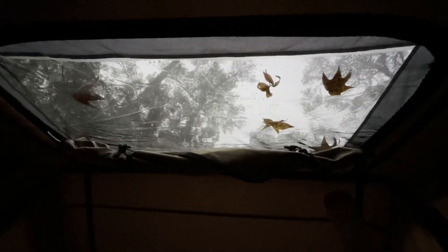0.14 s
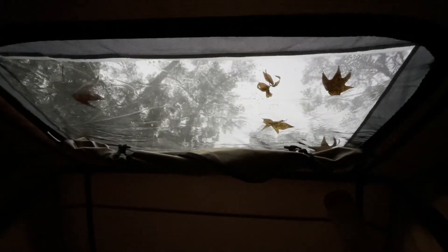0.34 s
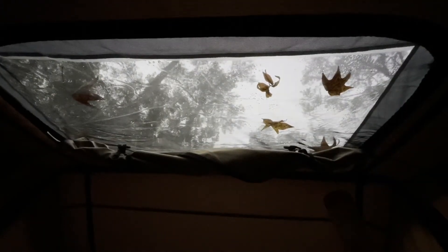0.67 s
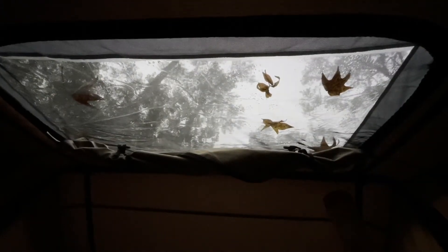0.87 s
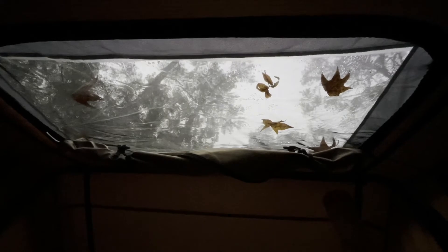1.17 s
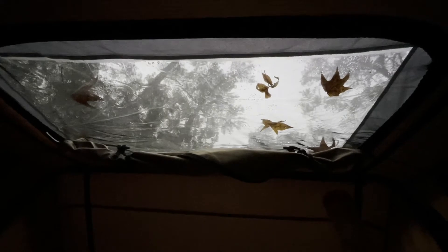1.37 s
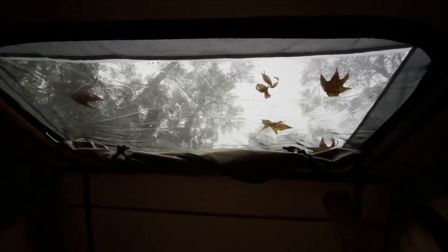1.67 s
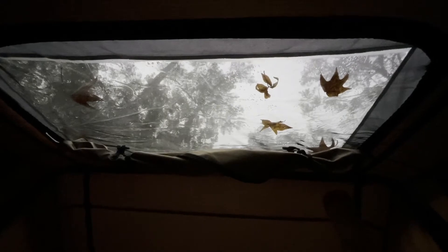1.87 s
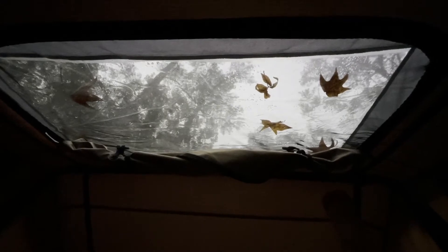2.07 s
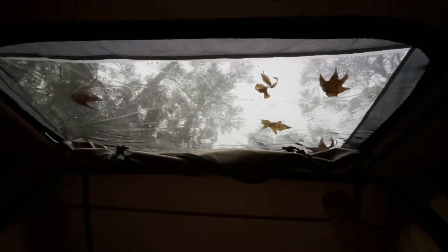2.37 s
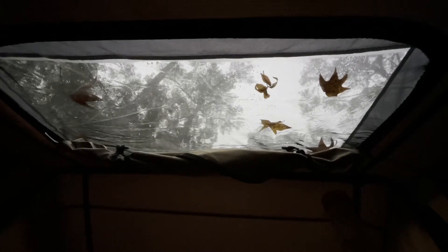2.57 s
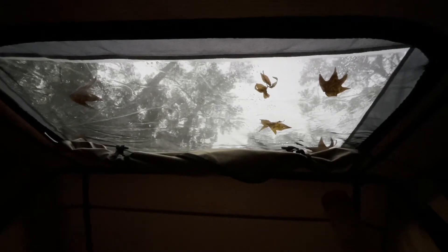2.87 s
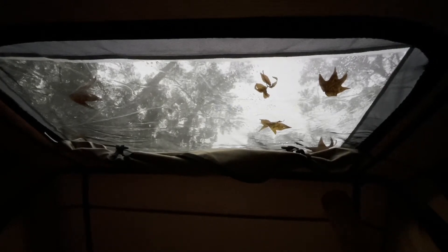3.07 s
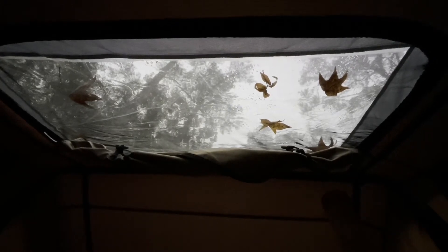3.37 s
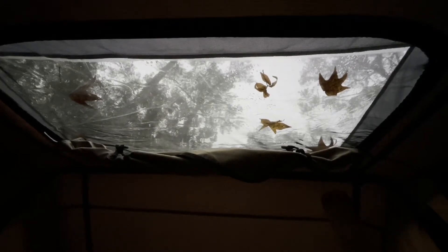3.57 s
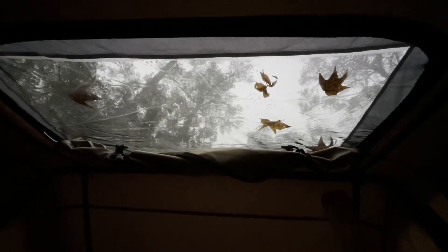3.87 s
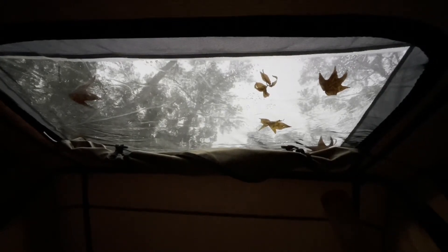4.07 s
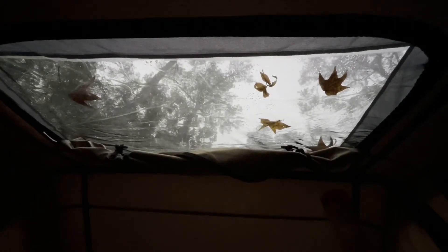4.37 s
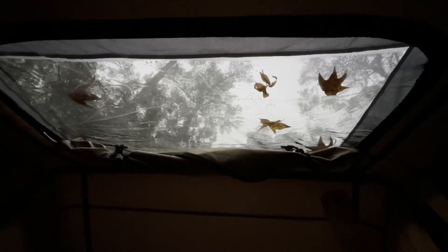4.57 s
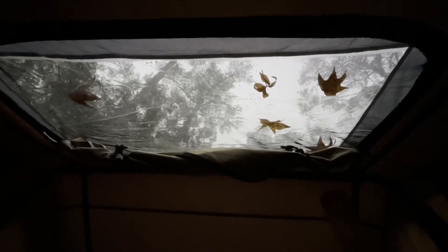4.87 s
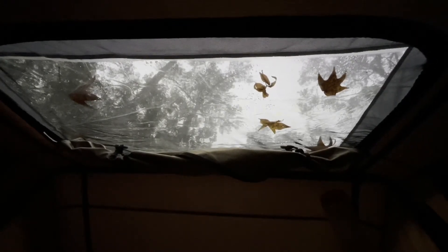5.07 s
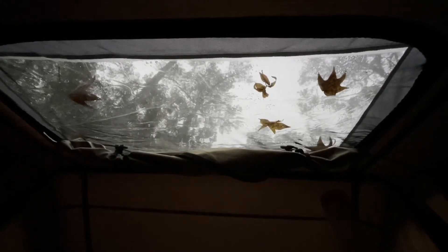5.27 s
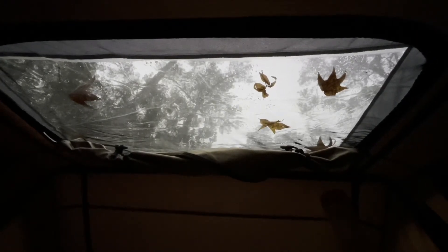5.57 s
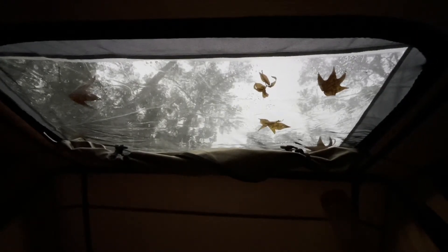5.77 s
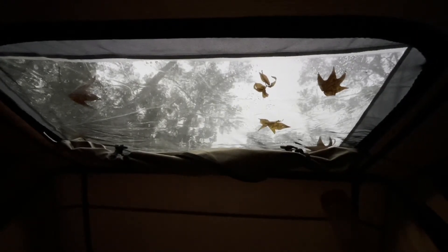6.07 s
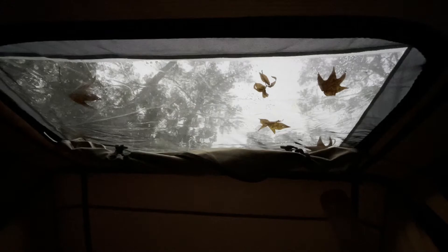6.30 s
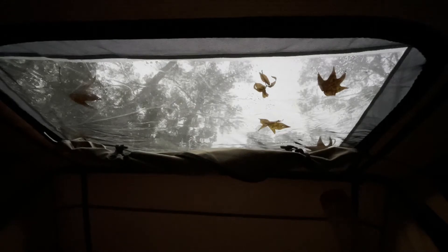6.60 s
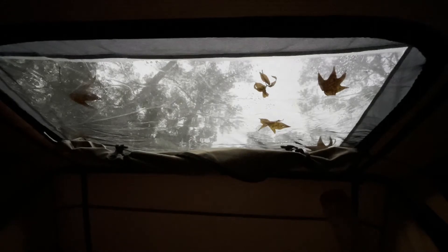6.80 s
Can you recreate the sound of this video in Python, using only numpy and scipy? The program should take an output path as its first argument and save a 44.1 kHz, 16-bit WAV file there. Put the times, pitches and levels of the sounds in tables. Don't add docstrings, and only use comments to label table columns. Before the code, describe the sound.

A diesel heater rumbles and hums steadily with a soft even pump tick, while drops tap tent canvas and a distant wren whistles briefly.

```python
import sys
import numpy as np
from scipy import signal
from scipy.fft import rfft, irfft, next_fast_len
from scipy.io import wavfile
from scipy.ndimage import map_coordinates

SR = 44100
rng = np.random.default_rng(int(sys.argv[2]) if len(sys.argv) > 2 else 0)


def wav_out(sig):
    wavfile.write(sys.argv[1], SR, np.round(np.clip(np.atleast_2d(sig).T, -1, 1) * 32767).astype(np.int16))


def volts_from_db(level):
    exponent = np.asarray(level, float) / 20
    return 10 ** exponent


N = 306054


def unit(x):
    return x / np.sqrt(np.mean(x ** 2) + 1e-20)


def along(points, hz):
    f, v = np.transpose(points)
    return np.interp(np.log(hz + 1), np.log(f + 1), v)


def over_time(points):
    return np.interp(np.arange(N) / SR, *np.transpose(points))


def wobble(knots_per_s):
    knots = rng.standard_normal(int(N * knots_per_s / SR) + 4)
    return map_coordinates(knots, [np.arange(N) * knots_per_s / SR])


def filtered(x, response):
    m = next_fast_len(x.shape[-1] + 8192)
    spectrum = rfft(x, m) * response(np.fft.rfftfreq(m, 1 / SR))
    return irfft(spectrum, m)[..., :x.shape[-1]]


def coloured(count, colour):
    return unit(filtered(rng.standard_normal(count), lambda hz: volts_from_db(along(colour, hz))))


def split_phase(radians):
    return np.exp(.5j * np.outer([-1, 1], radians))


# frequency in Hz, right lead in radians.
PORT_LEAD = [(95, 0), (140, 1.2), (200, .1), (260, .4), (310, 1.4), (450, 1.4), (525, 2.7), (710, 2.2),
             (900, 3.1), (1060, 1.8), (1200, -.4), (1300, 2.9), (2000, 2.9), (2600, 1.6)]


def lead(hz):
    return split_phase(along(PORT_LEAD, hz))


# frequency in Hz, likeness 0-1.
PORT_LIKENESS = [(30, 0.99), (90, 0.69), (140, 0.3), (220, .9), (390, 0.53), (530, 0.73), (1000, 0.2),
                 (1600, .55), (2200, 0.25), (5000, 0.18), (9000, 0.23), (13000, .2)]
# frequency in Hz, left minus right in dB.
PORT_LEAN = [(30, 0), (60, 1), (125, 4), (200, -3), (270, 2), (500, 4), (800, -1), (1300, 0), (1800, 2),
             (2300, 0), (3000, 7), (6000, 8), (9000, 0), (12000, 0)]


def rush(spectrum, modes=(), modes_db=0):
    def wash(hz):
        turn = np.arccos(np.clip(along(PORT_LIKENESS, hz), 0, 1)) / 2
        return volts_from_db(along(spectrum, hz)) * np.array([np.cos(turn), np.sin(turn)])

    def lean(hz):
        return volts_from_db(np.outer([.5, -.5], along(PORT_LEAN, hz))) * lead(hz)

    def ringing(hz):
        powers, phasors = [], []
        for centre_hz, width_hz, left_db, right_db, lead_rad in modes:
            detuning = (hz * hz - centre_hz * centre_hz) / (width_hz * hz + 1e-9)
            power = np.outer(volts_from_db(2 * np.array([left_db, right_db])), 1 / (1 + detuning ** 2) ** 2)
            powers.append(power)
            phasors.append(power.sum(axis=0) * np.exp(1j * (lead_rad - np.pi / 2)))
        turn = np.angle(sum(phasors)) + np.pi / 2
        return volts_from_db(modes_db) * np.sqrt(sum(powers)) * split_phase(turn)

    same, apart = filtered(rng.standard_normal((2, N)), wash)
    pair = filtered(np.array([same + apart, same - apart]), lean)
    if modes:
        pair = pair + filtered(rng.standard_normal(N), ringing)
    return unit(pair)


def echoes(x, decay):
    longest_s = max(t60_s for _, t60_s in decay)
    noise = rng.standard_normal((2, SR))[:, :int(SR * longest_s)]
    hz, t, z = signal.stft(noise, SR, nperseg=256)
    tail = signal.istft(z * volts_from_db(-60 * t / along(decay, hz)[:, None]), SR, nperseg=256)[1]
    return signal.fftconvolve(x[None], tail / np.linalg.norm(tail[0]), axes=1)


def add(track, s, sound):
    start = min(round(s * SR), N)
    track[:, start:start + sound.shape[1]] += sound[:, :track.shape[1] - start]


def sides(x, pan_db, tail_db, decay):
    wet = volts_from_db(tail_db) * echoes(x, decay)
    direct = filtered(np.pad(x, (0, wet.shape[1] - len(x))), lead)
    return (direct + wet) * volts_from_db([[pan_db / 2], [-pan_db / 2]])


# frequency in Hz, level in dB per Hz.
FLAME_ROAR = [(25, -40.5), (35, -28.5), (55, -9.5), (72, -10.5), (130, -11), (200, -14), (260, -18.5),
              (330, -33), (400, -120)]
# frequency in Hz, width in Hz, left in dB, right in dB, right lead in radians.
CHAMBER_MODES = [(91, 22, 1, -1, 0), (108, 22, -6, -9, .2), (170, 30, -13, -13, .5), (205, 35, -14, -9, .1)]
# time in seconds, rumble in dB.
FLAME_LEVEL = [(0, -34), (.3, -38), (.8, -35.5), (1.5, -36.5), (2.3, -35), (3.3, -34), (4.2, -35),
               (5.6, -35), (6.4, -33), (6.94, -35.5)]


def flame():
    level_db = over_time(FLAME_LEVEL) + 0.19 * wobble(3.6)
    return volts_from_db(level_db) * rush(FLAME_ROAR, CHAMBER_MODES, modes_db=1.4)


# frequency in Hz, level in dB per Hz.
FAN_AIR = [(150, -120), (220, -9), (280, 1.5), (390, -10.5), (520, -9.5), (590, -12.5), (690, -8.5),
           (800, -8), (950, -9), (1300, -14.5), (1750, -14), (2100, -25.5), (2600, -48.5), (3200, -120)]
# frequency in Hz, width in Hz, left in dB, right in dB,
# right lead in radians.
DUCT_MODES = [(305, 16, 1, 0, 1.3), (340, 20, 0, -1, 1.5), (422, 20, -4, -4, 1.5), (525, 50, -7, -10, 2.7),
              (760, 40, -6, -4, 2.5), (796, 28, 3, 7, 2.4), (828, 24, 1, 2, 1.8), (900, 55, -1, -2, 3.2),
              (1077, 40, -8, -5, 1.2), (1135, 50, -9, -1, 2.9), (1185, 40, -10, -8, -.5),
              (1500, 300, -17, -18, 2.7), (1665, 32, -3, -14, 2.6), (1800, 80, -19, -20, 2.3)]


def fan_air():
    return volts_from_db(-40 + 0.7 * wobble(9)) * rush(FAN_AIR, DUCT_MODES, modes_db=1.77)


# frequency in Hz, left in dB, right in dB.
FAN_TONES = [(305, -51, -52), (711, -55, -55)]


def fan_tones():
    pair = np.zeros((2, N))
    for hz, left_db, right_db in FAN_TONES:
        phase = 2 * np.pi * np.cumsum(hz + 1.6 * wobble(3)) / SR
        tone = np.sin(phase) * volts_from_db(1.7 * wobble(3.7))
        pair += volts_from_db([[left_db], [right_db]]) * tone
    return filtered(pair, lead)


# frequency in Hz, level in dB per Hz.
LEAF_RUSTLE = [(1500, -34), (1900, -6), (2300, 0.5), (2700, -4.5), (3200, -10.5), (3500, -12.5),
               (3800, -18), (5000, -25), (8000, -45)]
# time in seconds, leaves in dB.
BREEZE_LEVEL = [(0, -65.5), (1.6, -65.5), (2.1, -61.5), (3.2, -60.5), (3.7, -65.5), (4.5, -65),
                (5.6, -63.5), (6.4, -59.5), (6.94, -58.5)]


def leaves():
    level_db = over_time(BREEZE_LEVEL) + 1.3 * wobble(7) + 0.44 * wobble(23)
    return volts_from_db(level_db) * rush(LEAF_RUSTLE)


# frequency in Hz, level in dB per Hz.
STEADY_HISS = [(2500, -37.5), (3600, -3), (5000, -4), (7500, 1), (9300, -3.5), (10500, -3), (11500, -11.5),
               (12200, -12.5), (12600, -23), (14000, -26.5), (15700, -25)]


def hiss():
    return volts_from_db(-72) * rush(STEADY_HISS)


# start in seconds, peak in dB, brightness in dB, left minus right in dB.
CANVAS_TAPS = [(0.3746, -40, -12, 4), (0.563, -51.5, -11, 3), (0.6628, -49.5, -18, 3.5),
               (1.0913, -55, -13.5, 10), (1.3736, -43, -7, 5), (1.7387, -46.5, -29, 9),
               (1.853, -38, -13.5, -5), (1.8654, -43, -14, 14), (1.9199, -49, -9, 1),
               (2.575, -40.5, -20, 3), (2.607, -42.5, -9, 3.5), (3.1916, -59, -2, 5),
               (3.3588, -46, -11, 11), (3.5992, -53.5, -10, 8), (3.812, -42, -22, 4), (3.9845, -49, -20, 7),
               (4.6164, -45.5, -6, 4.5), (4.6564, -41.5, -12.5, 2), (4.6889, -46, -20.5, 7),
               (5.8284, -57, -5, 3), (5.9008, -52, -20, 14), (6.6198, -47, -20, 5), (6.6766, -47, -8, 3),
               (6.6994, -51, -9, 3.5), (6.847, -43, -12.5, 8), (6.44, -54, -8, 6), (6.53, -55, -8, 6),
               (6.73, -55, -7, 6), (6.78, -54, -9, 6), (6.905, -52, -7, 6)]
# frequency in Hz, level in dB.
CANVAS_THUD = [(700, -33), (1500, 0.5), (2500, -8.5), (3600, -10.5), (5000, -28.5), (8000, -47)]
# frequency in Hz, level in dB.
CANVAS_SNAP = [(3000, -35), (4300, 2.5), (7000, -2), (8500, -5), (10000, -6), (12300, -17.5), (13200, -54)]
# frequency in Hz, t60 in seconds.
TENT_DECAY = [(2000, .21), (6000, 0.12), (11000, 0.08)]
TAP_T60_S, SLACK_S_PER_DB = .03, 0.0131


def taps():
    track, t = np.zeros((2, N)), np.arange(SR // 3) / SR
    for s, peak_db, bright_db, pan_db in CANVAS_TAPS:
        slack_t60_s = TAP_T60_S - SLACK_S_PER_DB * bright_db
        fall = volts_from_db(-60 * t / .022) + volts_from_db(-5.5 - 60 * t / slack_t60_s)
        onset = 1 - np.exp(-t / 0.0005)
        dull, bright = coloured(len(t), CANVAS_THUD), coloured(len(t), CANVAS_SNAP)
        tap = volts_from_db(peak_db - 5) * fall * onset * (dull + volts_from_db(bright_db) * bright)
        add(track, s, sides(tap, pan_db, -2, TENT_DECAY))
    return track


# frequency in Hz, level in dB, t60 in seconds.
HOUSING_MODES = [(3510, -0.5, .02), (5440, -13.5, 0.025), (6120, -0.5, 0.014), (7260, -1, 0.015)]
# frequency in Hz, level in dB.
PUMP_CRACK = [(1500, -29), (2600, 8), (3600, 0), (4300, -8), (5500, -1.5), (7500, 0.5), (8800, -21),
              (10500, -22), (12500, -52)]
FIRST_STROKE_S, STROKE_EVERY_S, STROKES = .4559, .8311, 8
STROKE_DB, STROKE_SCATTER_DB = -52.7, .3


def pump():
    track, t = np.zeros((2, N)), np.arange(SR // 16) / SR
    blows = np.zeros(SR // 50)
    blows[[0, 110, 230, 490, 800]] = volts_from_db([-5.5, 1, -4.5, -10.5, -10])
    onset = 1 - np.exp(-t / 0.00036)
    for s in FIRST_STROKE_S + STROKE_EVERY_S * np.arange(STROKES):
        stroke_db = STROKE_DB + STROKE_SCATTER_DB * rng.standard_normal()
        ring = np.zeros(len(t))
        for hz, mode_db, t60_s in HOUSING_MODES:
            ring += volts_from_db(mode_db + rng.normal(0, 0.99) - 60 * t / t60_s) * np.sin(2 * np.pi * hz * t)
        crack = coloured(len(t), PUMP_CRACK) * volts_from_db(6.0 - 60 * t / 0.014)
        stroke = np.convolve((ring + crack) * onset, blows)
        add(track, s - .002, sides(volts_from_db(stroke_db - 4) * stroke, 6.5, -2, TENT_DECAY))
    return track


# start in seconds, level in dB, pace (stretch of time).
WREN_PHRASES = [
    (1.931, -52, 1.01),
    (2.318, -50.5, 1.03),
    (2.712, -50.5, 1.05),
    (3.131, -51.5, 1.08),
    (6.797, -54.5, 0.99),
]
# start in seconds, length in seconds, from Hz, to Hz, level in dB.
WREN_NOTES = [
    (.003, .047, 2570, 2439, 4),
    (.05, .042, 2420, 2276, 5.5),
    (.106, .032, 3090, 3230, -5),
    (.133, .016, 3200, 3600, 7),
    (.192, .028, 4850, 2450, 1),
]
TURNED_DB = [-0.5, 0, -2.3, -4, -17.5]
CREST_SHARE = [.75, 0.33, .6, .45, .25]
# frequency in Hz, t60 in seconds.
WOODS_DECAY = [(2000, 0.4), (3500, .8), (6000, 0.36)]
NEAR_S, NEAR_DB, FAR_S, FAR_DB = .009, -8, .085, -12.5
TRUNKS_DB = -11.5


def wren():
    track, lean = np.zeros((2, N)), volts_from_db([[2.8], [-2.8]])
    for s, phrase_db, pace in WREN_PHRASES:
        song = np.zeros((2, SR // 3))
        for note, direct_db, crest in zip(WREN_NOTES, TURNED_DB, CREST_SHARE):
            start_s, length_s, from_hz, to_hz, note_db = note
            u = np.arange(0, 1, 1 / (SR * pace * length_s))
            swell = np.sin(np.pi / 2 * np.interp(u, [0, crest, 1], [0, 1, 0])) ** 1.3
            phase = 2 * np.pi * np.cumsum(from_hz + (to_hz - from_hz) * u) / SR
            tone = np.sin(phase) * swell * volts_from_db(phrase_db + note_db)
            add(song, pace * start_s, tone * volts_from_db([[0], [direct_db]]))
        sung, facing = song
        add(track, s, lean * filtered(facing, lead))
        add(track, s + NEAR_S, lean * volts_from_db(NEAR_DB) * echoes(sung, WOODS_DECAY))
        add(track, s + FAR_S, lean * volts_from_db(FAR_DB) * echoes(sung, WOODS_DECAY))
        add(track, s + FAR_S, lean * volts_from_db(TRUNKS_DB) * facing)
    return track


# start in seconds, peak in dB, frequency in Hz.
BIRD_CHIPS = [
    (6.5194, -66, 5370),
    (6.5989, -69, 5400),
    (6.7745, -64, 4860),
    (6.8009, -62, 5410),
    (6.8157, -66, 5350),
    (6.8625, -59, 5470),
    (6.8794, -61, 4850),
    (6.9194, -68, 5040),
]


def chips():
    track, t = np.zeros((2, N)), np.arange(SR // 90) / SR
    for s, peak_db, hz in BIRD_CHIPS:
        chip = np.hanning(len(t)) * np.sin(2 * np.pi * (hz + 100 - 10000 * t) * t)
        add(track, s, sides(volts_from_db(peak_db - 1.0) * chip, 8, -4, WOODS_DECAY))
    return track


def scene():
    heater = flame() + fan_air() + fan_tones()
    return heater + leaves() + hiss() + taps() + pump() + wren() + chips()


def roll_off(x):
    return signal.sosfilt(signal.butter(12, 15720, fs=SR, output="sos"), x)


# frequency in Hz, gain in dB.
SUM_GAIN = [(9300, 0), (9800, -10.5), (10300, -9), (10800, -11.5), (11200, -1), (12200, -1.5), (12700, -6),
            (13300, -2)]
# frequency in Hz, gain in dB.
DIFFERENCE_GAIN = [(10500, -0.5), (11200, -6), (11700, -12), (12400, -11), (13200, -3.5)]


def record(dry):
    def colour(hz):
        return volts_from_db(np.array([along(SUM_GAIN, hz), along(DIFFERENCE_GAIN, hz)])) / 2

    left, right = dry
    both, apart = filtered(np.array([left + right, left - right]), colour)
    return roll_off(np.array([both + apart, both - apart]))


dry = scene()
out = record(dry)
wav_out(out)
```